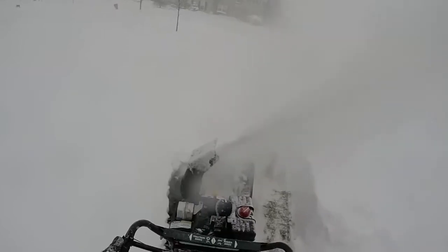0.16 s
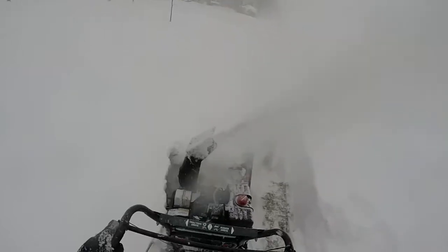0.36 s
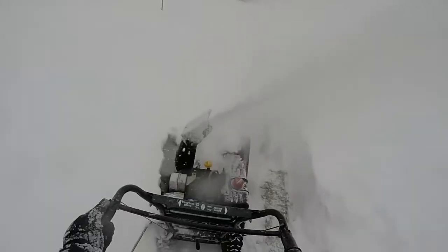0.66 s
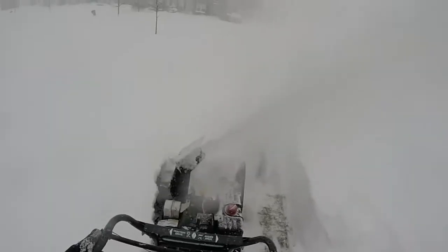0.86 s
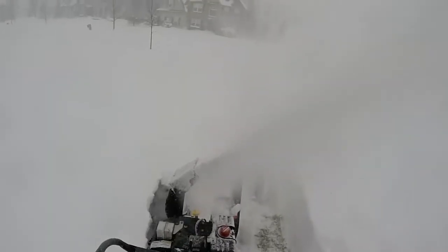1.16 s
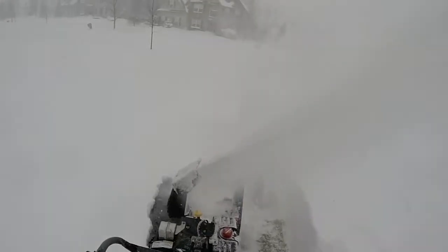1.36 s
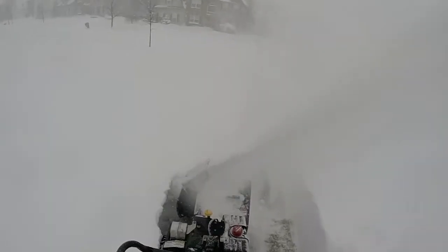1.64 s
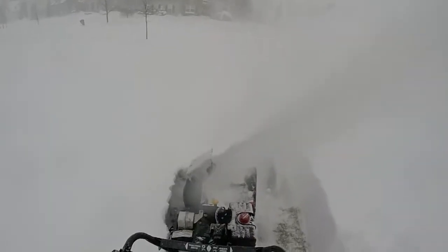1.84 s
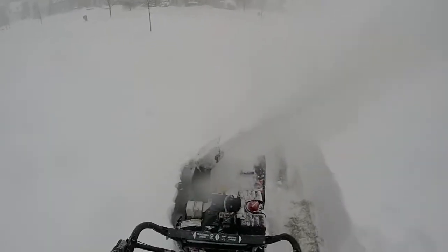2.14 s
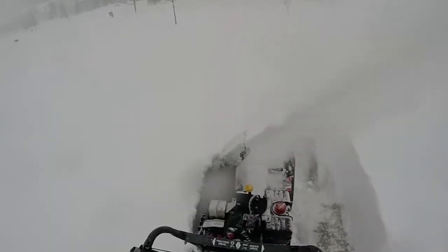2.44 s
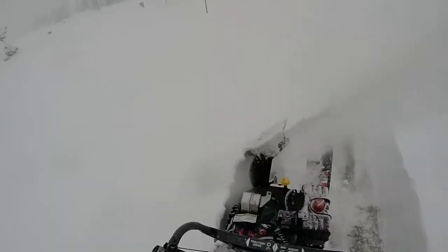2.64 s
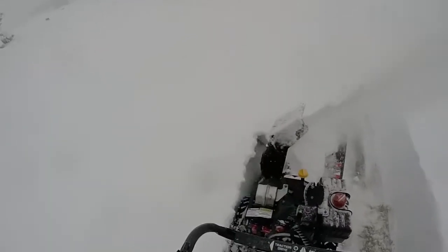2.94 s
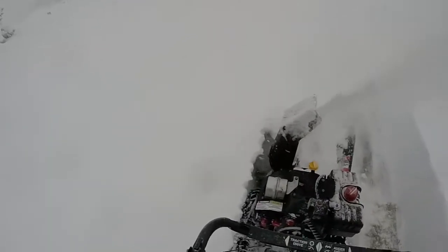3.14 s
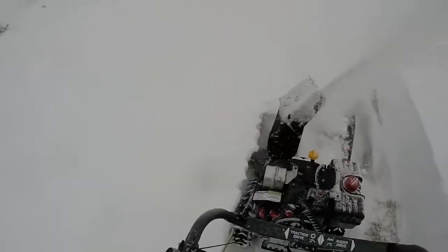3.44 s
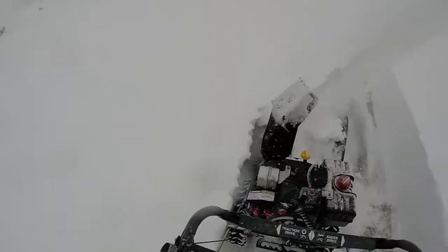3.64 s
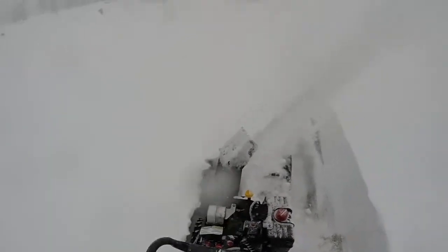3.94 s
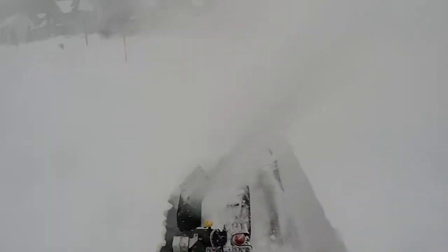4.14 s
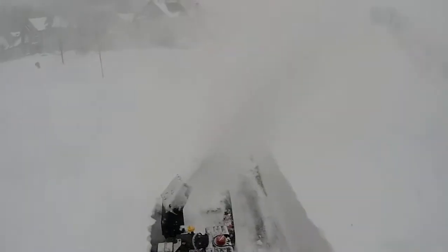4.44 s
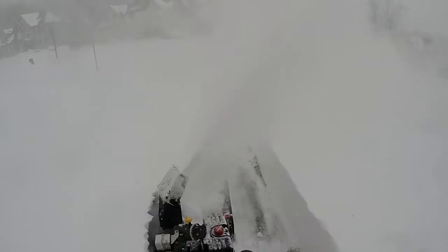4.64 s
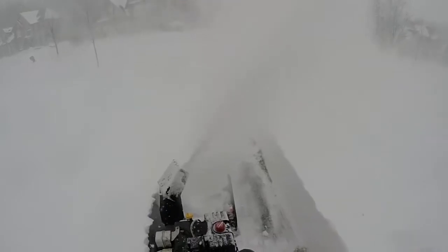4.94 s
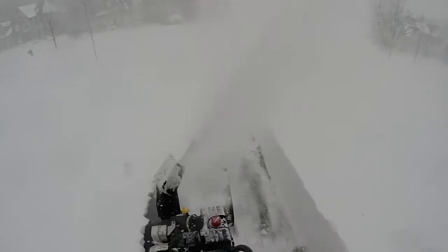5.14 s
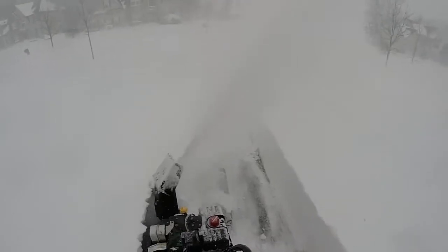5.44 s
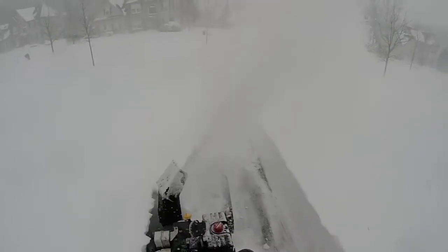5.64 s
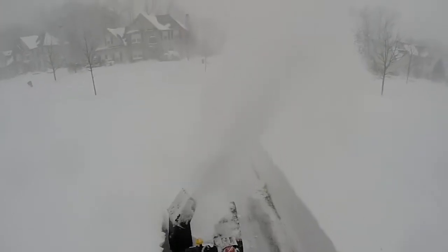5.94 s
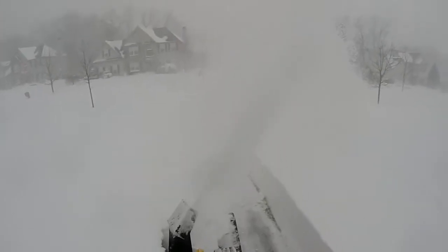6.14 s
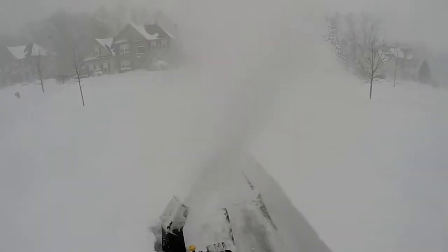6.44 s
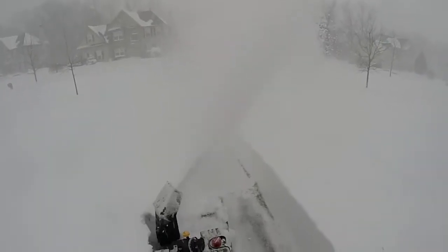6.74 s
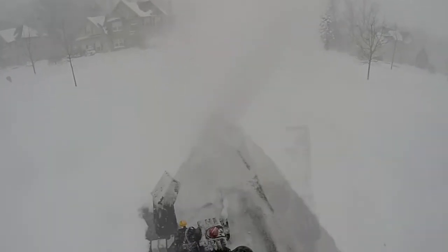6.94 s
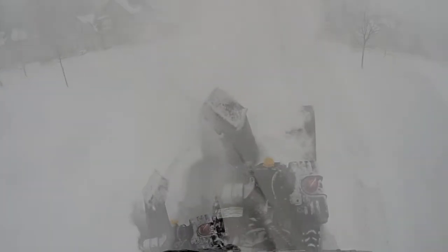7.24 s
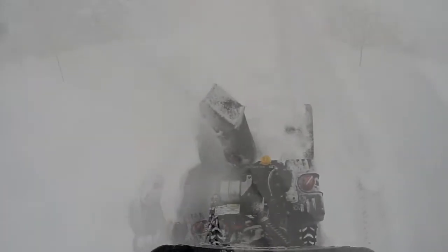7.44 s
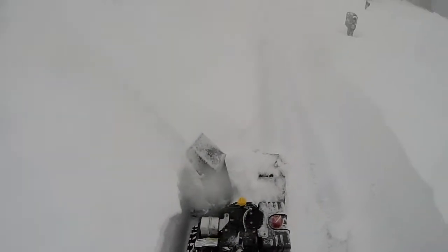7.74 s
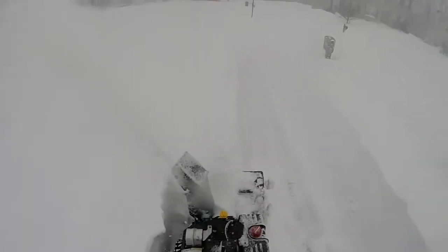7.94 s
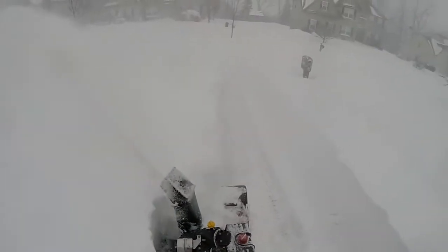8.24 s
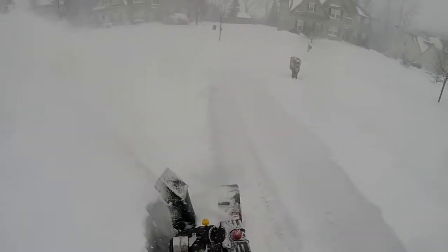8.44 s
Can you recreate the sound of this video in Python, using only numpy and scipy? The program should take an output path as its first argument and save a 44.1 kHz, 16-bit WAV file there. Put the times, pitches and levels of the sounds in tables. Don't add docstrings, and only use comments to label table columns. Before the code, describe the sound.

From 0 to about 8.6 seconds a walk-behind snow thrower runs without pause outdoors, heard from a housed microphone on the walker's head. The engine fires about 28 times a second, fast enough to blur into a raspy, fluttering buzz: each firing is a short bright spit of gas, with occasional thin whistling peaks around 3.6 kHz. Below lies a steady hum that throbs roughly twice a second as the blades beat against the engine, plus ringing sheet metal and continuous snow hiss. Small, soft low jolts mark footsteps. From about 2.7 to 3.9 seconds the head faces the engine, making it nearer, harsher and more whistly; by 4.1 it eases back. At 7.3 seconds the tone switches abruptly to a later pass, close and slightly different in colour, easing by 7.9 and running on to the cut-off end.

```python
import sys
import numpy as np
from scipy import signal
from scipy.fft import rfft, irfft
from scipy.io import wavfile

SR = 44100
rng = np.random.default_rng(int(sys.argv[2]) if len(sys.argv) > 2 else 0)


def log_audio(samples):
    frames = np.atleast_2d(samples).T
    limited = np.clip(frames, -1, 1)
    pcm = np.round(limited * 32767).astype(np.int16)
    wavfile.write(sys.argv[1], SR, pcm)


def convert_level_to_amplitude(level_db):
    exponent = np.asarray(level_db, float) / 20
    return 10 ** exponent


N = 378819

# time in seconds, firing lateness against an even clock in ms.
LATENESS = [(0, 8.6), (.9, 5.2), (1.53, 8.5), (1.68, 10.7), (2.04, 10.9), (2.94, 14.6), (3.24, 11.5),
            (3.54, 8.1), (4.26, 9.3), (4.95, 4.4), (5.28, 6.3), (6.25, 6.5), (6.42, 5), (6.81, 7.9),
            (7.292, 8.5), (7.294, -1.9), (7.83, 11.5), (8.59, 18.5)]
# time in seconds, facing 0-1.
FACING = [(0, .3), (1.9, .25), (2.55, .35), (2.72, 1), (3.9, 1), (4.12, 0), (7.292, 0), (7.294, 1),
          (7.7, 1), (7.9, .1), (8.59, 0)]
# peak in ms after the spit, level in dB, rise in ms, fall in dB per ms.
STROKES = [
    (-0.15, 3, 2.24, 5.5),
    (8.5, -11.5, 9.8, 23),
    (13.5, -19.5, 1.7, 0.7),
    (22.5, -16, 3.2, 4.8),
]
# centre in Hz, width in Hz, share gated by the flow 0-1, level in dB turned away,
# level in dB faced, then the same two levels on the later pass.
MUFFLER = [(2385, 440, 0.28, -8.5, -8.5, -14, -16), (2966, 320, 0.89, -9, -6.5, -5, -0.5),
           (3330, 370, 0.61, -6, 0.5, -10.5, 1), (4816, 370, 0.45, -6, -10, -5.5, -6.5),
           (5256, 340, 0.54, -4.5, -4, 0, -4.5), (5716, 316, 0.79, 1.86, -0.5, 0.5, -1.5),
           (6610, 366, 0.72, -7.5, 1, -6.5, -4), (7240, 420, 0.55, -29, -27, -11.5, -14),
           (8420, 500, 0.84, -11.5, -5, -7, -8.5), (9220, 690, 0.77, -7.5, -8, -5.5, -7.5),
           (10030, 400, 0.89, -6, -9, -6, -4), (10700, 360, 0.71, -11, -18, -10, -19),
           (11630, 540, 0.79, -10, -12, -9.5, -17), (12130, 680, 0.96, -20, -15.5, -7, -8),
           (13400, 690, 0.9, -11.5, -19, -16.5, -21), (14560, 730, 0.87, -22, -13, -13, -19)]
# time in seconds, whistle level in dB.
OUTLET_AIM = [(0, -35.5), (.65, -28.5), (1.2, -32), (1.6, -37.5), (2.2, -37.5), (2.5, -34), (3.0, -32.5),
              (3.5, -30.5), (3.75, -31), (4.05, -40), (5.6, -39), (6.0, -42.5), (7.25, -43), (7.3, -38.5),
              (7.5, -28), (7.8, -39.5), (8.0, -36.5), (8.59, -38)]
# time in seconds, whistle peak in dB.
HARD_FIRINGS = [(.1156, -15.5), (.3651, -24), (.402, -12.5), (.6165, -16), (.6519, -14), (.7602, -14),
                (.831, -14.5), (.9388, -17), (1.1204, -14.5), (1.3379, -14.5), (2.4563, -16), (2.5292, -21),
                (2.5656, -15), (2.7816, -18), (2.8534, -17.5), (3.1033, -14.5), (3.246, -15),
                (3.3174, -11.5), (3.459, -9.5), (3.5309, -13), (3.5668, -12), (3.6017, -15.5), (3.6381, -9),
                (3.7459, -17), (3.9619, -17), (7.4425, -16), (7.4784, -18), (7.6266, -16), (7.7383, -21),
                (8.0656, -20)]
# time in ms after the spit, level in dB, direction of push +1 or -1.
VALVES = [
    (-1.0, 0, 1),
    (10.0, -2, -1),
    (14.0, -7, 1),
    (25, -8, 1),
]
# multiple of the firing rate, level in dB, level in dB on the later pass.
HUM_LINES = [(1, -10, -18), (2, -3, -1.5), (3, -12.5, -11), (4, -6, -4.5), (5, -4, -7), (6, -10, -13),
             (7, -10.5, -7.5), (8, -1.5, -0.5), (9, -11.5, -16), (10, -15, -8.5), (11, -12, -7.5),
             (12, -29, -10), (13, -30, -12), (15, -13.5, -15), (16, -16, -14), (18, -14.5, -25),
             (19, -17, -16), (20, -24, -11), (21, -19.5, -17), (23, -15, -16), (24, -12, -10),
             (25, -20.5, -15), (26, -11, -13), (27, -14.5, -9), (28, -14, -19), (29, -18, -13),
             (33, -16, -10), (34, -16.5, -11.5), (35, -21, -17), (36, -13.5, -15)]
# centre multiple, width in multiples, lift in dB.
FACED_HUM = [
    (4.5, 2.5, 3),
    (10.5, 2.5, 2.5),
]
# centre in Hz, width in Hz, level in dB, level in dB on the later pass.
COWL_MODES = [(1494, 250, -6, -3), (1500, 160, -5, -18), (1756, 53, 2, 6), (1843, 28, -2, 6.5),
              (2310, 105, -5, -2), (2567, 85, 0.5, -10)]
# multiple of the blade rate, level in dB.
BLADE_LINES = [(1, -54), (2, -63), (3, -56.5), (4, -58.5), (5, -57.5), (6, -61), (7, -65.5), (8, -62.5),
               (9, -61), (10, -64)]
BLADE_MEETS = [
    (-.38, .15, .68, 1.15, 1.6, 2.07, 2.6, 3.12, 3.68, 4.22, 4.78, 5.3, 5.87, 6.42, 6.95, 7.5),
    (7.1, 7.64, 8.17, 8.7),
]
# frequency in Hz, level in dB per Hz.
SNOW_SPECTRUM = [(15, -16), (40, -6.5), (125, -18), (240, -13), (370, -15), (720, -12.5), (1000, -17.5),
                 (1500, -14.5), (1750, -6.5), (2030, -16), (2500, -11), (3500, -9.5), (4350, -22),
                 (5300, -11.5), (7600, -25.5)]
# time in seconds, peak in dB, swing in Hz.
FOOTFALLS = [(.42, -28, 60), (0.891, -28, 50.3), (1.41, -32, 40.4), (1.98, -37, 35.6), (2.43, -36, 55.1),
             (2.569, -38, 40), (2.79, -33, 35), (2.875, -27.5, 26.8), (3.26, -38, 21.87), (3.34, -34, 35),
             (3.52, -37, 40), (3.98, -49, 30), (5.711, -34, 65), (5.84, -33, 54.6), (6.29, -31, 27.9),
             (7.35, -38, 27.86), (7.44, -33.5, 36.7), (7.91, -42, 21.8), (8.259, -40, 29.9),
             (8.556, -30, 60.5)]
# centre in Hz, width in Hz, depth in dB.
HOUSING_DIPS = [(1113, 134, -5), (1349, 153, -13.5), (4540, 230, -9)]

CYCLE_S, JUMP_S = .03595, 7.293
JET_DB, JET_FACED_DB, JET_LATER_DB = -32.5, 1.36, 1.3
SHUT_DB = -29.5
SWAY_DB, SWAY_PER_S = 1, 0.57
WHISTLE_HZ, WHISTLE_WIDTH_HZ, WHISTLE_SCATTER = 3605, 170, .3
HUM_DB, HUM_FACED_DB, HUM_SAG_DB_PER_S = -42.5, 1, -0.0031
SNOW_DB, SNOW_FACED_DB, SNOW_SAG_DB_PER_S = -43, 3, -0.0027
SNOW_ON_COWL_DB = -31
TOP_HZ = 15050

T_S = np.arange(N) / SR
LATER = T_S > JUMP_S


def rms_one(x):
    return x / np.sqrt(np.mean(x ** 2) + 1e-20)


def in_time(rows):
    s, value = np.transpose(rows)
    return np.interp(T_S, s, value)


def drift(rate_hz):
    r = np.exp(-80 * np.pi * rate_hz / SR)
    white = rng.standard_normal(N // 40 + 2002)
    slow = signal.lfilter([1], [1, -2 * r, r * r], white)[2000:]
    return np.interp(np.arange(N) / 40, np.arange(len(slow)), rms_one(slow))


def resonate(x, hz, width_hz):
    r = np.exp(-np.pi * width_hz / SR)
    zeros = np.array([1, 0, -1]) * (1 - r * r) / 2
    poles = [1, -2 * r * np.cos(2 * np.pi * hz / SR), r * r]
    return signal.lfilter(zeros, poles, x)


def per_firing(firing):
    return rng.standard_normal(300)[firing]


def cycle_clock(cycles, jitter_ms):
    firing = np.floor(cycles + .2).astype(int) + 1
    ms = (cycles + 1 - firing) * CYCLE_S * 1000
    return firing, ms - jitter_ms * per_firing(firing)


def flow(ms):
    clock_ms = np.arange(-12, 34, .05)
    power = convert_level_to_amplitude(2 * SHUT_DB)
    for at_ms, peak_db, rise_ms, fall_db_per_ms in STROKES:
        after_ms = clock_ms - at_ms
        loss_db = np.where(after_ms < 0, 10 * (after_ms / rise_ms) ** 2, fall_db_per_ms * after_ms)
        power = power + convert_level_to_amplitude(2 * (peak_db - loss_db))
    return np.interp(ms, clock_ms, 10 * np.log10(power))


def jet(cycles, jet_db, facing):
    firing, ms = cycle_clock(cycles, jitter_ms=0.073)
    flow_db = flow(ms) + 1.6 * drift(220)
    spit = np.clip((flow_db + 12) / 12, 0, 1)
    white = rng.standard_normal((2, N))
    out = np.zeros(N)
    for k, (hz, width_hz, gated, away_db, faced_db, later_away_db, later_faced_db) in enumerate(MUFFLER):
        burst_db = gated * flow_db + spit * 1.2 * per_firing(firing)
        turned_db = np.where(LATER, later_away_db, away_db)
        toward_db = np.where(LATER, later_faced_db, faced_db)
        colour_db = turned_db * (1 - facing) + toward_db * facing
        gas = convert_level_to_amplitude(colour_db + burst_db + SWAY_DB * drift(SWAY_PER_S)) * white[k % 2]
        out += resonate(resonate(gas, hz, width_hz), hz, 2.16 * width_hz)
    return convert_level_to_amplitude(jet_db) * rms_one(out)


def whistle(cycles, whistle_db):
    firing, ms = cycle_clock(cycles, jitter_ms=0.99)
    peak_db = whistle_db + 11 + 2.45 * per_firing(firing)
    for s, hard_db in HARD_FIRINGS:
        peak_db[firing == firing[round((s + .003) * SR)]] = hard_db
    scatter = WHISTLE_SCATTER + .6 * LATER
    hz = WHISTLE_HZ + scatter * (80 * per_firing(firing) + 220 * drift(150))
    width_ms = np.where(ms < 0, 1.3, 2.7)
    swell = np.exp(-(ms / width_ms) ** 2) * convert_level_to_amplitude(2 * drift(290))
    tone = convert_level_to_amplitude(peak_db) * swell * np.sin(2 * np.pi * np.cumsum(hz) / SR)
    breath = convert_level_to_amplitude(0.61 * flow(ms)) * rng.standard_normal(N)
    breath = resonate(resonate(breath, WHISTLE_HZ, WHISTLE_WIDTH_HZ), WHISTLE_HZ, 940)
    return resonate(tone, WHISTLE_HZ, 1500) + convert_level_to_amplitude(whistle_db - 6) * rms_one(breath)


def stacking(k):
    at_ms, level_db, direction = np.transpose(VALVES)
    turns = k * at_ms / 1000 / CYCLE_S
    return np.angle(np.sum(direction * convert_level_to_amplitude(level_db) * np.exp(-2j * np.pi * turns)))


def hum(cycles, hum_db, facing):
    sway = drift(1.8)
    out = np.zeros(N)
    for multiple, first_db, later_db in HUM_LINES:
        k = round(multiple)
        lift_db, later_lift_db = (db * np.exp(-((k - at) / width) ** 2) for at, width, db in FACED_HUM)
        first_level_db = first_db - 4 + lift_db * (facing - .25)
        later_level_db = later_db - 5 + later_lift_db * (facing - .4)
        flutter_db = (1.2 + k / 30) * drift(1 + k / 10)
        gain = convert_level_to_amplitude(np.where(LATER, later_level_db, first_level_db) + flutter_db)
        out += gain * np.sin(2 * np.pi * k * cycles + stacking(k) + .008 * k * sway)
    return np.sqrt(2) * convert_level_to_amplitude(hum_db) * out


def cowl(cycles, level_db):
    taps = np.zeros(N)
    for at_ms, tap_db, direction in VALVES:
        at = np.flatnonzero(np.diff(np.floor(cycles - at_ms / 1000 / CYCLE_S)))
        taps[at] = direction * convert_level_to_amplitude(tap_db + 2 * rng.standard_normal(300)[:len(at)])
    patter = convert_level_to_amplitude(SNOW_ON_COWL_DB + 2.3 * drift(1.8)) * rng.standard_normal(N)
    struck = taps + patter
    rings = np.zeros(N)
    for hz, width_hz, first_db, later_db in COWL_MODES:
        rings += resonate(struck * convert_level_to_amplitude(np.where(LATER, later_db, first_db)), hz, width_hz)
    return convert_level_to_amplitude(level_db - 1) * rms_one(rings)


def impeller(cycles):
    first, later = (np.interp(T_S, meets, np.arange(len(meets))) for meets in BLADE_MEETS)
    slipped = np.where(LATER, later, first)
    phase = 2 * np.pi * (2 * cycles - slipped) + stacking(2)
    out = np.zeros(N)
    for k, level_db in BLADE_LINES:
        out += np.sqrt(2) * convert_level_to_amplitude(level_db + drift(2.4)) * np.sin(round(k) * phase)
    return out


def snow(level_db, patchy_db):
    hz = np.fft.rfftfreq(N, 1 / SR)[1:]
    shape_hz, shape_db = np.transpose(SNOW_SPECTRUM)
    colour = convert_level_to_amplitude(np.interp(np.log(hz), np.log(shape_hz), shape_db, right=-70))
    shaped = irfft(rfft(rng.standard_normal((2, N))) * np.r_[0, colour], N)
    together = drift(2.3)
    out = np.zeros(N)
    for k, low_hz in enumerate(15 * 2. ** np.arange(10)):
        octave = signal.butter(2, [low_hz, 2 * low_hz], "band", fs=SR, output="sos")
        band = signal.sosfilt(octave, shaped[k % 2])
        out += convert_level_to_amplitude(patchy_db * (.5 * together + drift(16))) * band
    return convert_level_to_amplitude(level_db + 3) * rms_one(out)


def jolts():
    out = np.zeros(N)
    for s, peak_db, hz in FOOTFALLS:
        turns = (T_S - s) * hz
        out -= convert_level_to_amplitude(peak_db) * np.sin(2 * np.pi * turns) * np.exp(-(turns / 0.67) ** 2)
    return out


def scene():
    facing = in_time(FACING)
    cycles = (T_S - in_time(LATENESS) / 1000) / CYCLE_S
    jet_db = JET_DB + JET_FACED_DB * facing + JET_LATER_DB * LATER
    hum_db = HUM_DB + HUM_FACED_DB * facing + HUM_SAG_DB_PER_S * T_S
    snow_db = SNOW_DB + SNOW_FACED_DB * facing + SNOW_SAG_DB_PER_S * T_S
    gas = jet(cycles, jet_db, facing) + whistle(cycles, in_time(OUTLET_AIM))
    iron = hum(cycles, hum_db, facing) + cowl(cycles, snow_db) + impeller(cycles)
    return (gas + iron + snow(snow_db, patchy_db=-0.09) + jolts())[None]


def band_limit(x):
    return signal.sosfilt(signal.butter(12, 16470, fs=SR, output="sos"), x)


def record(dry):
    for hz, width_hz, depth_db in HOUSING_DIPS:
        dry = dry - (1 - convert_level_to_amplitude(depth_db)) * resonate(dry, hz, width_hz)
    rolloff = signal.cheby1(7, 1, TOP_HZ, fs=SR, output="sos")
    return band_limit(signal.sosfilt(rolloff, dry))


dry = scene()
out = record(dry)
log_audio(out)
```